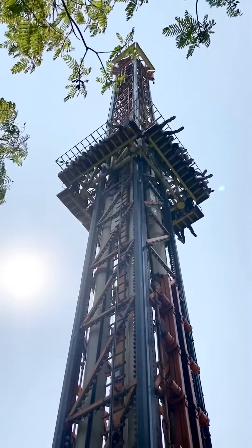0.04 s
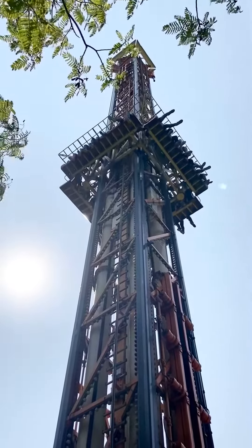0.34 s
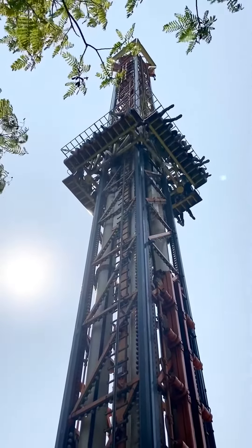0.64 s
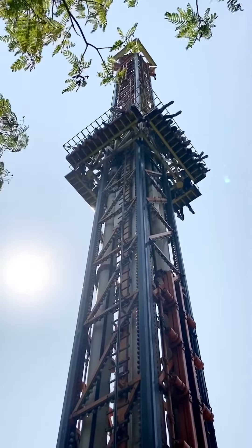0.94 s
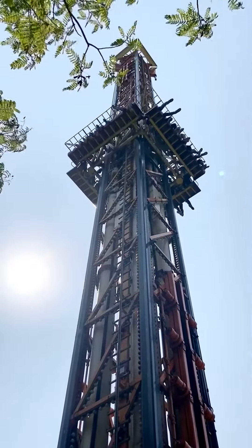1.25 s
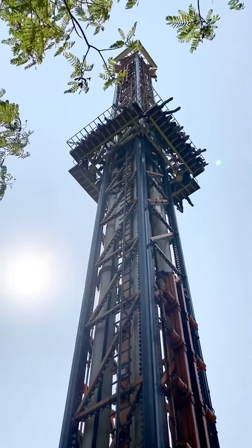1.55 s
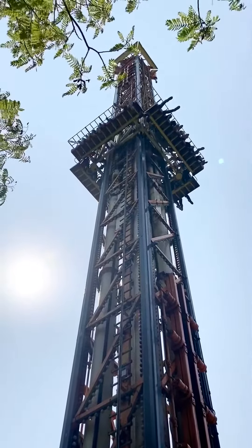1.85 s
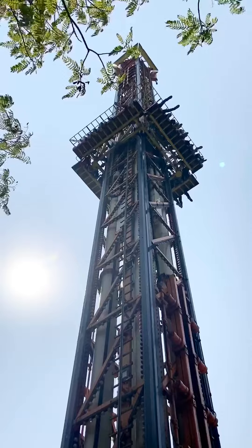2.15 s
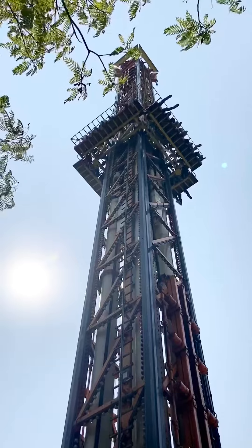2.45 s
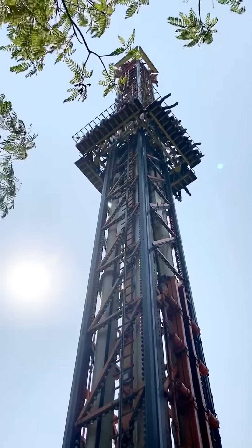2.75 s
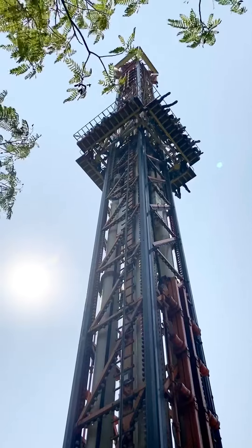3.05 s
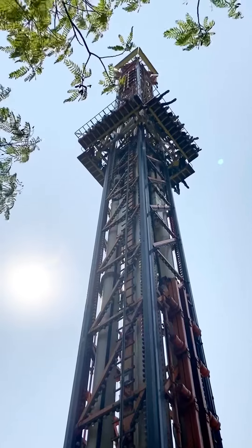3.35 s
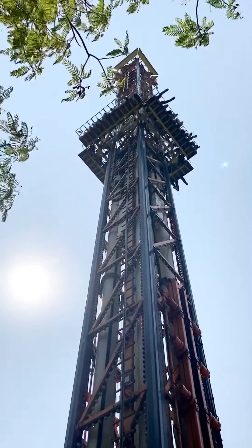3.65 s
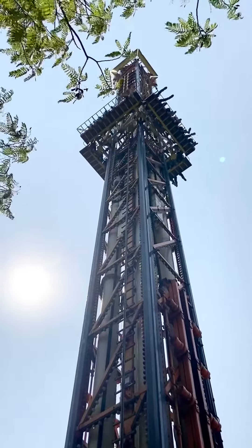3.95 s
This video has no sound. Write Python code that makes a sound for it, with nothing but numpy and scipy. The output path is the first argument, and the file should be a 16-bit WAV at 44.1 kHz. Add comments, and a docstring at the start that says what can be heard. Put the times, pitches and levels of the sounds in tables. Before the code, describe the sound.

Machinery of an amusement park tower ride roars steadily outdoors, a dense rush of air with a hum and faint squeals. A thin whistle joins, and a deep drone slowly climbs with a few dull knocks, heard on a phone.

```python
"""Machinery at the foot of an amusement-park tower ride, heard outdoors on a phone.
From the start, turbulent air excites broad pipe resonances, a constant-speed machine hums, and
faint squeals come and go. Within a second a thin whistle sets in and a deep drone, probably a drive
motor, begins a slow climb, with occasional dull knocks. The main pipe resonance flares during the first
second and a half; near the end, a short low judder roughens the drone."""
import sys
import numpy as np
from scipy import signal
from scipy.fft import rfft, irfft
from scipy.io import wavfile
from scipy.ndimage import map_coordinates

SR = 44100
rng = np.random.default_rng(int(sys.argv[2]) if len(sys.argv) > 2 else 0)


def dump_mix(stems):
    """Bounce the given channels to the path in sys.argv[1] as a 16-bit WAV at rate SR."""
    frames = np.atleast_2d(stems).T  # one column per channel
    limited = np.clip(frames, -1, 1)  # hard clip at full scale
    pcm = np.round(limited * 32767).astype(np.int16)
    wavfile.write(sys.argv[1], SR, pcm)


N = 176400

# Spectrum of the rushing air. Each row: frequency in Hz, relative density in dB.
AIR_SPECTRUM = [(20, -21), (60, -2), (160, -6.5), (300, -8), (450, -5.5), (590, -4), (700, -7.5),
                (900, -0.5), (1150, 0.5), (1450, -0.5), (2000, 0), (2600, -0.5), (3400, -4), (4200, -7),
                (5000, -12), (6500, -44), (16000, -70)]
# Envelope of the rush. Each row: time in seconds, level in dB.
AIR_LEVEL = [(0, -25), (1.2, -26), (2.4, -25.5), (4, -26)]
def air(flicker_db=0.84, flicker_hz=8.5, swell_db=0.3):
    """Turbulence radiates broadband noise, whose bands flicker separately and swell together."""
    rush = rfft(noise(undb(across(AIR_SPECTRUM))))
    octave = np.clip(np.floor(np.log2(bins())), 8, 13)  # octave bands, open at both ends
    out = np.zeros(N)
    for band in np.unique(octave):
        out += irfft(rush * (octave == band), N) * undb(flicker_db * walk(flicker_hz))
    return out * undb(curve(AIR_LEVEL) + swell_db * walk(6))


# Pipe modes. Each row: centre in Hz, width in Hz, levels in dB at 0, 1, 2, 3 and 4 s, flicker in dB.
PIPE_MODES = [(1334, 54, -38.5, -42.5, -43.5, -41.5, -52, 1),
              (2124, 176, -37.5, -34, -33.5, -35, -33.5, .9),
              (2300, 180, -27.5, -29.5, -30.5, -32.5, -31.5, 0.99),
              (3066, 290, -29.5, -31.5, -32.5, -35.5, -36.5, 1),
              (3660, 100, -39, -35, -34.5, -43.5, -38, 0.95), (3842, 200, -38, -33, -34, -36.5, -38, 1.5),
              (4912, 134, -37.5, -39.5, -40, -43, -41.5, 1.1), (5450, 89, -45, -49, -47, -48, -46, .8),
              (6010, 96, -46, -45, -43.5, -47, -45, 0.7)]
def pipes(pitch_drift=.005, pitch_sag=.012, flicker_hz=5.2):
    """Resonance: the flow excites pipe modes, which wander and sink a little in pitch."""
    out, n = np.zeros(N), np.arange(N)
    sag = pitch_sag * (.5 - n / N)
    for hz, width, *levels_db, flicker_db in PIPE_MODES:
        mode = ringing(hz, width)
        detune = sag + pitch_drift * walk(5.95)
        drifting = map_coordinates(mode, [n + np.cumsum(detune)], mode="wrap")  # resampling bends pitch
        db = np.interp(n, np.linspace(0, N, len(levels_db)), levels_db)
        out += drifting * undb(db + flicker_db * walk(flicker_hz))
    return out


# Speed of the drive shaft. Each row: time in seconds, rotation rate in Hz.
SHAFT_RATE = [(0, 37), (.2, 36.2), (.4, 37.2), (.62, 36.8), (.78, 41.6), (1, 44), (1.3, 44.6), (1.95, 47.7),
              (2.5, 52.1), (3.1, 56.3), (3.5, 59.4), (3.8, 59), (4, 62.8)]
# Envelopes of the two shaft harmonics and the rumble. Each row: time in seconds, level in dB.
FIRST_ORDER_LEVEL = [(0, -56), (.6, -54), (.78, -39), (1.3, -38), (1.9, -37), (1.98, -29), (2.2, -37),
                     (2.5, -28), (2.88, -28.5), (2.96, -26.5), (3.05, -26), (3.2, -31), (3.42, -26.5),
                     (3.63, -26), (3.73, -38), (3.85, -31), (4, -41)]
SECOND_ORDER_LEVEL = [(0, -33.5), (.08, -21.5), (.2, -24), (.4, -27.5), (.5, -21.5), (.62, -27.5),
                      (.68, -33), (.75, -25.5), (.95, -29), (1.15, -29), (1.3, -28.5), (1.37, -37),
                      (1.48, -25), (1.62, -30), (1.72, -22.5), (2.02, -22), (2.25, -31.5), (2.45, -31.5),
                      (2.53, -34), (2.6, -30), (2.8, -28), (3.05, -40.5), (3.2, -33), (3.42, -48),
                      (3.72, -33.5), (3.8, -46), (3.93, -37.5), (4, -37)]
RUMBLE_LEVEL = [(0, -50), (.35, -47), (.7, -37), (1.1, -42), (1.6, -36.5), (2, -48), (2.3, -46),
                (2.75, -50), (2.95, -32), (3.15, -51), (3.5, -33.5), (3.68, -38), (3.85, -46), (4, -43)]
# Spectrum of the rumble. Each row: frequency in Hz, relative density in dB.
RUMBLE_SPECTRUM = [(20, -44), (32, -29), (45, -9), (62, 6), (90, 7), (120, -1.5), (150, -28), (260, -75)]
def drive(speed_wobble=0.0094, flutter_db=1.5):
    """Rotational harmonics: two orders, phase-locked to an accelerating shaft, throb over a rumble."""
    shaft_hz = curve(SHAFT_RATE) * (1 + speed_wobble * walk(23))
    angle = 2 * np.pi * (np.cumsum(shaft_hz) / SR + rng.random())
    first = undb(curve(FIRST_ORDER_LEVEL) + flutter_db * walk(17)) * np.sin(angle)
    second = undb(curve(SECOND_ORDER_LEVEL) + flutter_db * walk(24)) * np.sin(2 * angle)
    rumble = undb(curve(RUMBLE_LEVEL)) * noise(undb(across(RUMBLE_SPECTRUM)))
    return np.sqrt(2) * (first + second) + rumble


# Envelope of the hum's fundamental. Each row: time in seconds, level in dB.
HUM_LEVEL = [(0, -39), (.1, -40.5), (.35, -36.5), (.42, -47), (.55, -38), (.68, -35.5), (1.17, -51.5),
             (1.27, -40), (1.55, -42), (1.85, -37), (2.14, -44.5), (2.26, -35.5), (2.58, -36.5),
             (2.73, -47), (3, -47.5), (3.2, -39.5), (3.4, -38.5), (3.55, -48), (3.86, -38), (4, -43)]
# Hum overtones and faint, steady, narrow ringing bands that colour the rush of air.
# Each row: frequency in Hz, width in Hz, first and last level in dB.
NARROW_BANDS = [(399.5, 11.4, -41.5, -49), (412.6, 13.4, -42, -46), (544, 6, -44.5, -66),
                (614.3, 12, -43, -56), (846, 24, -53, -44), (921, 12, -51, -43), (1125, 40, -50, -43),
                (1583, 14, -46, -46), (1685, 8, -44.5, -43.5), (1780, 14, -47, -49), (1890, 40, -44, -43),
                (1958, 24, -50, -44), (2073, 20, -45, -43), (2767, 14, -46, -47), (2875, 20, -45.5, -46),
                (3066, 20, -43, -45), (3630, 28, -48, -44)]
def hum_and_bands(fundamental_hz=206.2, pitch_wobble=0.0083, roughness=.45):
    """Beating roughens a machine's hum; narrowband noise gives its overtones and a ring in the rush."""
    fundamental = tone(fundamental_hz * (1 + pitch_wobble * walk(5.24)))
    rough = fundamental + roughness * ringing(fundamental_hz, width_hz=36)
    bands = sum(ringing(hz, width) * undb(np.linspace(first_db, last_db, N))
                for hz, width, first_db, last_db in NARROW_BANDS)
    return rough / rough.std() * undb(curve(HUM_LEVEL)) + bands


# Spectrum of the hiss. Each row: frequency in Hz, relative density in dB.
HISS_SPECTRUM = [(20, -70), (2500, -35), (4300, -3), (5200, 0), (5900, 0), (6300, -3.5), (7400, -3),
                 (8400, -3.5), (8800, -9), (9050, -9), (9500, -6), (10500, -6.5), (10900, -4.5),
                 (11400, -11), (12000, -11), (12500, -16), (14600, -16), (15600, -21)]
# Envelope of the hiss. Each row: time in seconds, level in dB.
HISS_LEVEL = [(0, -35.5), (1.5, -33.5), (2.5, -35.5), (4, -37.5)]
def hiss(flicker_db=0.35):
    """Flow noise: escaping air supplies a smooth treble."""
    return noise(undb(across(HISS_SPECTRUM))) * undb(curve(HISS_LEVEL) + flicker_db * walk(6))


# Envelope of the whistle. Each row: time in seconds, level in dB.
WHISTLE_LEVEL = [(0, -54), (.35, -44), (.6, -47), (.88, -37.5), (1.5, -38), (2.1, -40), (2.85, -35),
                 (3.4, -36), (4, -34.5)]
def whistle(hz=9205, width_hz=180, waver_hz=34, breath_db=-3, flicker_db=2.26):
    """A frequency-modulated tone in a narrow band of noise is heard as a thin, breathy whistle."""
    core = tone(hz + waver_hz * walk(41))
    band = 1 / (1 + (2 * (bins() - hz) / width_hz) ** 4)
    breathy = core + undb(breath_db) * noise(band)
    return breathy / breathy.std() * undb(curve(WHISTLE_LEVEL) + flicker_db * walk(39))


# Squeals. Each row: start in seconds, length in seconds, pitch in Hz, level in dB.
SQUEALS = [(0.0, 0.42, 544, -39), (0.04, 0.3, 1088, -33), (0.16, 0.28, 2215, -31), (0.25, 0.25, 3833, -38),
           (0.424, 0.26, 947, -34), (0.5, 0.65, 3068, -36), (1.45, 0.28, 3825, -37),
           (2.35, 0.95, 2955, -36.5), (3.3, 0.7, 2955, -37), (3.56, 0.32, 2153, -33)]
def squeals(pitch_wobble=0.0035, flutter_db=2):
    """Random amplitude and frequency modulation makes faint tones flutter as they swell and fade."""
    out = np.zeros(N)
    for start, length, hz, db in SQUEALS:
        envelope = undb(db + flutter_db * walk(40)) * swell(start, length)
        out += envelope * tone(hz * (1 + pitch_wobble * walk(42)))
    return out


# Flares of the main pipe mode. Each row: midpoint in seconds, pitch in Hz, level in dB.
FLARES = [(0.1, 2292, -20.5), (0.472, 2320, -24), (0.745, 2240, -27), (0.977, 2300, -23), (1.04, 2290, -25),
          (1.33, 2300, -28)]
def flares(length_s=0.042, pitch_wobble=0.01177):
    """The main pipe resonance rings out in brief tone bursts."""
    out = np.zeros(N)
    for midpoint, hz, db in FLARES:
        envelope = undb(db) * swell(midpoint - length_s / 2, length_s)
        out += envelope * tone(hz * (1 + pitch_wobble * walk(80)))
    return out


# Knocks in the drive. Each row: time of the peak in seconds, peak level in dB, pitch in Hz.
KNOCKS = [(0.428, -27.5, 101), (0.737, -22, 69.4), (1.399, -23, 88.5), (2.939, -35, 75), (3.674, -23.5, 87),
          (3.75, -25.5, 81)]
def knocks(rise_s=0.0156):
    """Damped oscillation: each dull thud builds and dies within a few cycles."""
    out = np.zeros(N)
    for peak_time, db, hz in KNOCKS:
        age = np.maximum(np.arange(N) / SR - peak_time + rise_s, 0)
        rise = age / rise_s
        envelope = (rise * np.exp(1 - rise)) ** 2
        out += undb(db) * envelope * np.sin(2 * np.pi * hz * age)
    return out


# Envelope of the judder. Each row: time in seconds, level in dB.
JUDDER_LEVEL = [(3.3, -70), (3.48, -37), (3.58, -34), (3.67, -41), (3.76, -38), (3.83, -63)]
# Spectrum of the judder. Each row: frequency in Hz, relative density in dB.
JUDDER_SPECTRUM = [(20, -50), (60, -18), (120, -4), (160, -7), (230, -14), (400, -19), (1000, -70)]
def judder():
    """Random vibration: a burst of low noise roughens the drone late in its climb."""
    return undb(curve(JUDDER_LEVEL)) * noise(undb(across(JUDDER_SPECTRUM)))


# Reflections from ground and steelwork. Each row: delay in seconds, relative gain.
ECHOES = [(.00225, .13), (.00454, .16), (.00522, .18), (.00745, .1), (.00975, .11), (.01014, .08),
          (.017, .08), (.0276, .09), (.0294, .1)]
def reflected(x, echo_db=-2.5, cutoff_hz=2460):
    """Comb filtering: dull near reflections interfere with the direct sound and colour it hollow."""
    echoes = sum(gain * np.exp(-2j * np.pi * bins() * delay) for delay, gain in ECHOES)
    dulled = echoes / np.hypot(1, bins() / cutoff_hz)
    return irfft(rfft(x) * (1 + undb(echo_db) * dulled), N)


# Likeness of the two microphone ports. Each row: frequency in Hz, coherence from 0 to 1.
PORT_COHERENCE = [(70, .999), (110, .997), (200, .97), (600, .93), (1500, .95), (2600, .88), (3200, .9),
                  (4400, .82), (4900, .93), (5500, .83), (6300, .76), (7000, .96), (7800, .95), (8700, .7),
                  (9200, .95), (10000, .88), (12000, .75), (13000, .92), (14200, .9), (15000, .75)]
# Phase between the ports. Each row: frequency in Hz, lead of the left in radians before the bass taper.
PORT_PHASE = [(300, -.1), (750, -.3), (1400, -.05), (2050, .05), (2550, .5), (3100, .25), (3400, .25),
              (3600, .7), (3900, .75), (4100, .65), (4400, .85), (4700, .7), (4950, .2), (5250, .15),
              (5650, .8), (6000, 1.6), (6800, 2.85), (7900, 3.3), (8400, 4.1), (9200, 5), (9800, 6.1),
              (11400, 6.5), (12600, 9.1), (14200, 9.6), (15500, 10.6)]
# Balance of the ports. Each row: frequency in Hz, left minus right in dB.
PORT_BALANCE = [(100, 0), (300, .2), (1000, -.3), (2800, -.9), (5000, 0), (15000, 0)]
def ports(x, scatter_decay_s=.1, bass_taper_hz=250):
    """Partial coherence: two ports differ in phase, level and scatter, but hear the bass alike."""
    direct = rfft(x)
    tail = rfft(rng.standard_normal(N) * np.exp(-np.arange(N) / SR / scatter_decay_s))
    scatter = direct * tail / np.sqrt(np.mean(abs(tail) ** 2))
    coherence = np.clip(across(PORT_COHERENCE), 0, 1)
    phase = across(PORT_PHASE) * (1 - np.exp(-(bins() / bass_taper_hz) ** 2))
    side = np.array([[1], [-1]])  # left, right
    pair = np.sqrt((1 + coherence) / 2) * direct + side * np.sqrt((1 - coherence) / 2) * scatter
    return irfft(pair * np.exp(.5j * side * phase) * undb(side * across(PORT_BALANCE) / 2), N)


def undb(db):
    """Amplitude ratio of a level in decibels."""
    return 10 ** (np.asarray(db) / 20)


def curve(rows):
    """Linear interpolation of a table over time."""
    times, values = np.transpose(rows)
    return np.interp(np.arange(N) / SR, times, values)


def bins():
    """Fourier frequencies in Hz, floored at 1."""
    return np.maximum(np.arange(N // 2 + 1) * SR / N, 1)


def across(rows):
    """Interpolation of a table over log frequency."""
    hz, values = np.transpose(rows)
    return np.interp(np.log(bins()), np.log(hz), values)


def noise(gain):
    """Random phases turn a magnitude spectrum into noise of rms 1."""
    x = irfft(gain * np.exp(2j * np.pi * rng.random(N // 2 + 1)), N)
    return x / x.std()


def ringing(hz, width_hz):
    """Narrowband noise is heard as a ringing pitch."""
    return noise(1 / (1 + ((bins() - hz) / (.75 * width_hz)) ** 2) ** 1.5)


def walk(rate_hz):
    """Low-pass noise gives a smooth fluctuation of rms 1."""
    return noise(1 / (1 + (bins() / rate_hz) ** 4))


def tone(hz):
    """A sine of rms 1 whose phase is the integral of its frequency."""
    return np.sqrt(2) * np.sin(2 * np.pi * (np.cumsum(hz) / SR + rng.random()))


def swell(start, length):
    """A half-sine envelope."""
    return np.sin(np.pi * np.clip((np.arange(N) / SR - start) / length, 0, 1))


def scene():
    """Superposition: all the sources add at one listening spot."""
    drone = drive() + knocks() + judder()
    airflow = reflected(air() + pipes()) + hiss()
    return ports(drone + airflow + hum_and_bands() + squeals() + flares() + whistle())


def record(dry, cutoff_hz=15800):
    """Band limiting: the phone's steep low-pass filter removes the highest treble."""
    return signal.sosfilt(signal.ellip(8, .2, 80, cutoff_hz, fs=SR, output="sos"), dry)


dry = scene()
out = record(dry)
dump_mix(out)
```